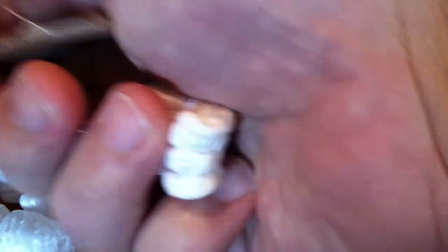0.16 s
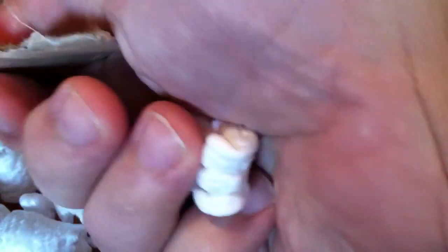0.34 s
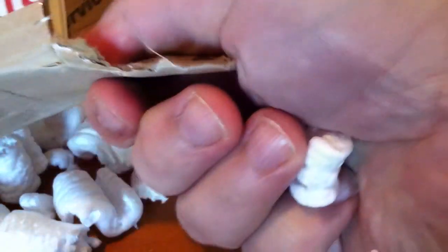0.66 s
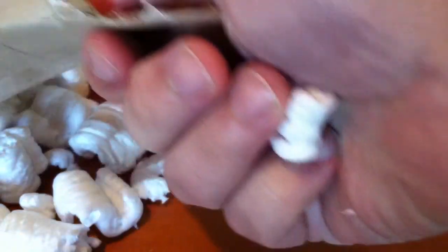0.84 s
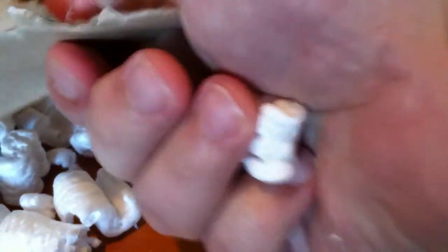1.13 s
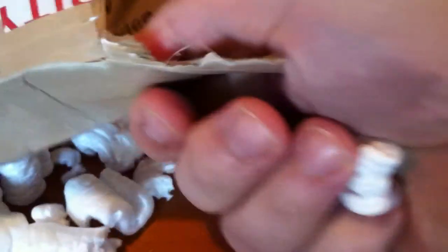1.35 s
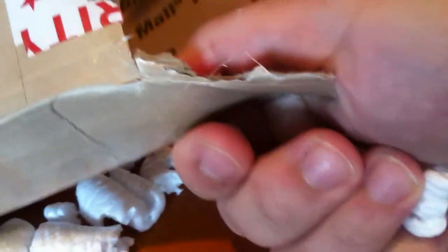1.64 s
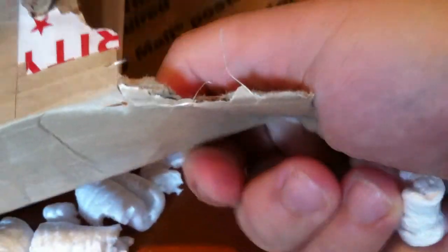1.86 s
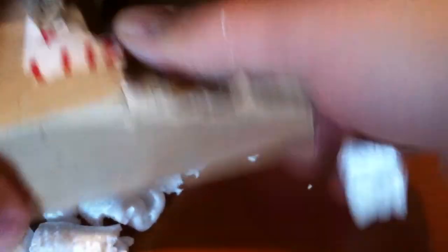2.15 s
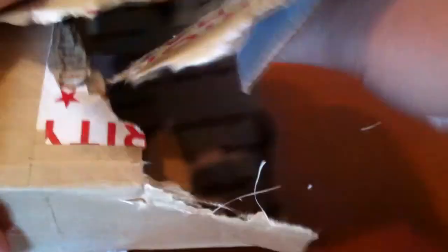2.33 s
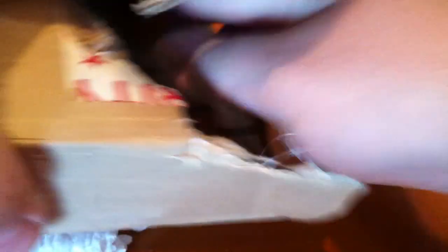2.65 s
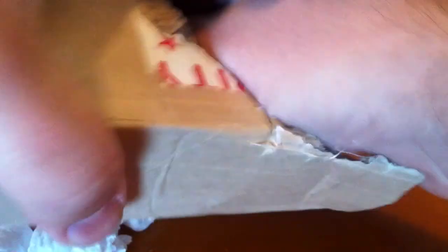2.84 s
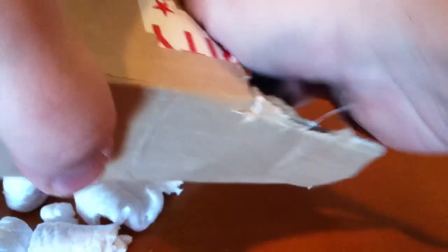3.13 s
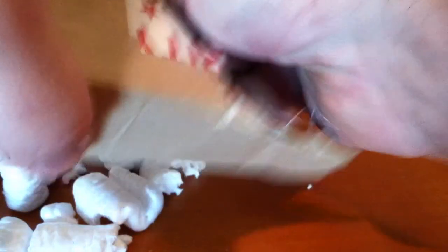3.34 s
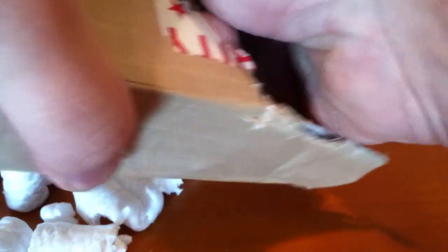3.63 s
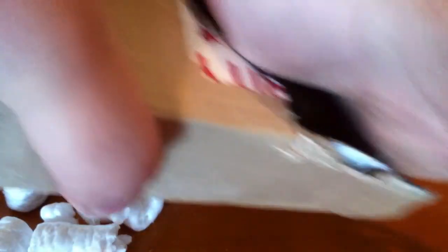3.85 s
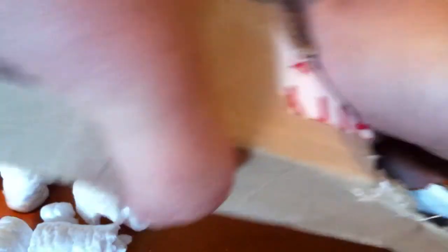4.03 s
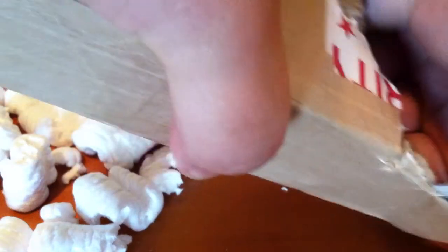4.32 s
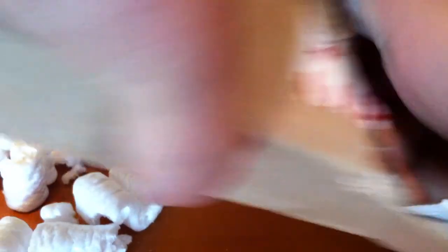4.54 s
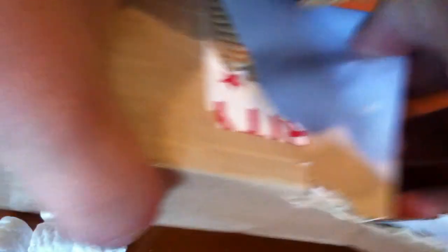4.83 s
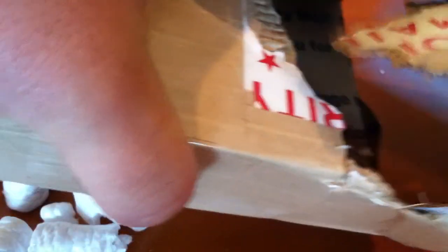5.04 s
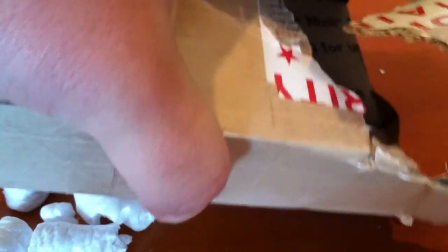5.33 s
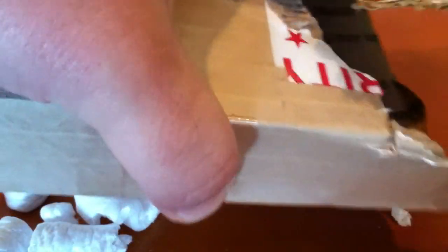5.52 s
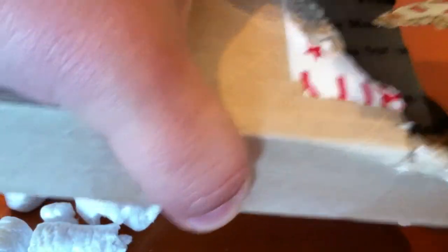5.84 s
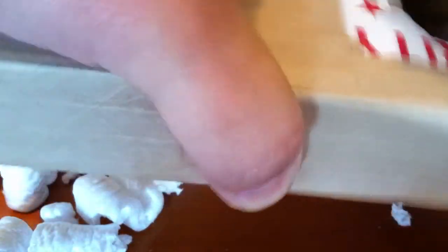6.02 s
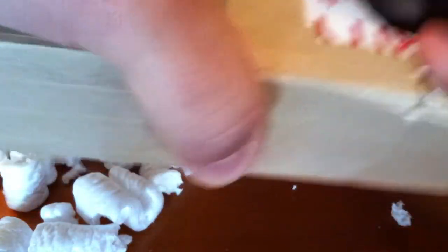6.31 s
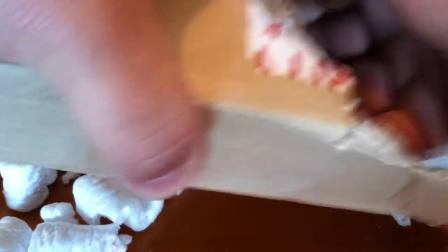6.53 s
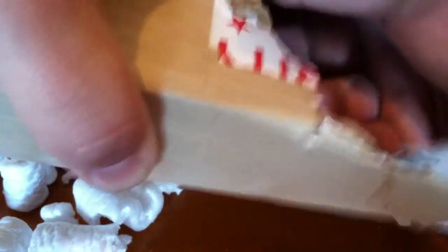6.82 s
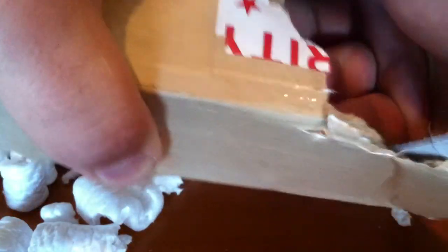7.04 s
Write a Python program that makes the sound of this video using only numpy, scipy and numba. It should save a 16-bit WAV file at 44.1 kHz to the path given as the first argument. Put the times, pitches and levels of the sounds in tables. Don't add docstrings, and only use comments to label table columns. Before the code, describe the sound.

Close, dry rustling and crackling of packing foam and cardboard, sharp snaps, scrapes and boxy thumps in a small quiet room.

```python
import sys
import numpy as np
from scipy import signal
from scipy.fft import rfft, irfft
from scipy.io import wavfile
from scipy.ndimage import uniform_filter1d
from numba import njit

SR = 44100
rng = np.random.default_rng(int(sys.argv[2]) if len(sys.argv) > 2 else 0)


def elevation(decibels):
    levels = np.asarray(decibels, float)
    return 10 ** (levels / 20)


def materialize(psi):
    bounded = np.clip(np.atleast_2d(psi).T, -1, 1)
    quanta = np.round(bounded * 32767).astype(np.int16)
    wavfile.write(sys.argv[1], SR, quanta)


N = 316197


def rubbing():
    # pitch_hz, width_hz, level_db
    hollow_modes = [(194, 63, 4), (293, 80, 5.5), (405, 87, 10)]
    wall_modes = [(589, 99, 2.5), (740, 53, 0), (936, 183, 5), (1300, 260, 5)]
    foam_modes = [(1860, 346, -0.5), (2365, 420, 0), (2680, 530, 1.5), (3370, 750, -0.5), (3870, 380, -1.5),
                  (4740, 970, 0.5)]
    edge_modes = [(5480, 440, -8), (6100, 1250, -8), (7500, 870, -7), (8130, 1160, -7), (11800, 7500, -26),
                  (13350, 1200, -21)]
    t = np.arange(N) / SR
    control_t = t[::64]
    levels = stroke_levels(control_t)
    hard = np.clip((np.interp(t, control_t, levels[2]) + 51.0) / 15, .15, 1)
    crackle = slips(420, spread_db=3.0, smear_s=.0009)
    rustle = slips(700, spread_db=2.0, smear_s=0.015) * elevation(2.3 * walk(40))
    shared = rustle + 1.13 * hard * crackle
    # modes, share of the common stream, patchiness_db, lift_db
    parts = [(hollow_modes, .5, 2.5, -1.5), (wall_modes, .7, 2.0, -1.5),
             (foam_modes, .85, 1.8, -1.2), (edge_modes, .85, 2.1, -1.35)]
    out = 0
    for db, (modes, share, patchy_db, lift_db) in zip(levels, parts):
        own = slips(500, spread_db=3.5, smear_s=0.0027)
        drive = share * shared + np.sqrt(1 - share ** 2) * own
        out = out + body(drive, modes, patchy_db) * elevation(np.interp(t, control_t, db) + lift_db)
    return out


def stroke_levels(t):
    # start_s, level_db, box_over_foam_db, fade_s (per 20 dB)
    grabs = [(0.0, -50, 3.5, 0.13), (0.088, -56, 1, 0.8), (0.39, -56.5, 2, 0), (0.496, -37.5, -5.5, 0.46),
             (1.202, -47, 4, 0.15), (1.332, -45.5, -5.5, 0.83), (2.252, -47, -2.5, 0.13),
             (3.614, -47.5, 0, 0.22), (3.801, -50, 2.5, 0.77), (3.998, -47.5, 1.5, 0.17),
             (4.035, -45.5, -4.5, 0.05), (4.069, -44.5, 2, -0.31), (4.216, -48.5, -0.5, 0.5),
             (4.411, -44.5, 5.5, -0.35), (4.559, -47.5, 4.5, 0.46), (4.62, -39, -17, 0.6),
             (4.847, -38.5, 0.5, 0.16), (5.085, -37.5, 0, 0.1239), (5.16, -43, -17, -0.02),
             (5.21, -60.5, -5, 1), (5.483, -46, -5.5, 0.12), (2.471, -54, -4.5, 0.03),
             (5.876, -43.5, -3, 0.3), (6.033, -50.5, -24, 0.52), (6.145, -55.5, 5, 0.5),
             (6.415, -49.5, 3.5, 0.85), (6.579, -49.5, 0.5, 0.2), (7.15, -51, 0.1, 0.5)]
    # peak_s, level_db, box_over_foam_db, swell_s, fade_s (per 20 dB)
    sweeps = [(0.298, -52, 2, -0.4, -0.75), (0.64, -41.5, -3, -0.01, 0.49), (0.813, -40.5, -6, 0.4, 0.08),
              (1.028, -44.5, -2.5, 0.1, 0.34), (1.445, -42.5, -0.5, 0.19, 0.07), (1.7, -51, -0.5, 0.1, 1),
              (1.999, -49, -4.5, 0.13, 0.5), (2.131, -43.5, -4.5, 0.12, 0.15), (2.407, -54.5, -12, 0, 0.1),
              (2.502, -53, 1.5, 0.4, 0.4), (2.766, -55.5, -21.5, 0.25, -0.26), (2.897, -51, 3.5, 0.5, 1.2),
              (3.072, -47.5, -0.5, 0, -0.31), (3.284, -44, 0, 0.1, 0.01), (3.489, -46.5, 1, 0.22, 0.05),
              (3.55, -55.5, 6, 0.2, 0.7), (4.345, -48.5, 1, -0.03, 0.3), (4.715, -38.5, 2, 0.22, 0.1753),
              (4.991, -45, -1, -1, 0.36), (5.018, -42, -5, -0.13, 0.0553),
              (5.766, -34.5, -6.5, -0.0176, 0.1044), (6.308, -47, 0, 0.3, 0.1),
              (6.476, -46.5, 4, 0.06, -0.11), (6.78, -51.5, -2.5, 0, 0.23), (6.93, -46, -1, -0.1, -0.05),
              (7.04, -48, 2.5, 0.07, 0.23), (6.715, -49, -9, 0.7, 0.5)]
    # time_s, boom_db (freedom of the hollow), paper_db (loose paper at the fingers)
    handling = [(0, -4, 0), (0.35, -4, -1), (0.8, 0.5, -6), (1.5, -1.5, 0), (2.0, 1, -3), (2.3, -23, -6),
                (2.7, -3, -1), (3.7, -6.5, -4), (4.2, -9.5, -5.5), (4.6, -7.5, -7), (5.3, 2, -4),
                (5.5, 1, 1.5), (5.7, 1, -10.5), (6.0, -13.5, -6.5), (6.4, -5.5, -1.5), (6.8, -2.5, -3),
                (7.17, -3, -4)]
    grab_swell_s = 0.03
    strokes = [(s, db, box_db, grab_swell_s, fade_s) for s, db, box_db, fade_s in grabs] + sweeps
    box_share = np.array([[0.99], [1], [0], [-0.19]])
    power = np.full((4, len(t)), 1e-9)
    for s, db, box_db, swell_s, fade_s in strokes:
        before = (s - t) / max(swell_s, .005)
        after = (t - s) / max(fade_s, .005)
        now_db = db - 20 * np.maximum(before, after)
        power += elevation(now_db + box_db * box_share) ** 2
    level_db = 10 * np.log10(power)
    brighter_db = 0.2051 * (level_db[2] + 47.0)
    s, boom_db, paper_db = np.transpose(handling)
    edge_db = np.interp(t, s, paper_db) + brighter_db
    return level_db + [np.interp(t, s, boom_db), 0 * t, 0 * t, edge_db]


def slips(per_s, spread_db, smear_s):
    hit = rng.random(N) < per_s / SR
    size = hit * elevation(np.minimum(spread_db * rng.exponential(1, N), 19))
    puff = signal.lfilter([1], [1, -np.exp(-1 / (smear_s * SR))], size)
    y = puff * rng.standard_normal(N)
    return y / np.std(y)


def walk(rate):
    k = int(SR / rate)
    steps = np.repeat(rng.standard_normal(N // k + 1), k)
    return 1.3 * uniform_filter1d(uniform_filter1d(steps, k), k)[:N]


def body(x, modes, patchy_db):
    y = 0
    for k, (hz, width_hz, db) in enumerate(modes):
        b, a = signal.iirpeak(hz, hz / (1.7 * width_hz), SR)
        rung = signal.lfilter(b, a, signal.lfilter(b, a, x)) / np.sqrt(width_hz)
        y = y + (-1) ** k * elevation(db + patchy_db * walk(18)) * rung
    return y / np.std(y)


def scrapes():
    # start_s, length_s, level_db, pitch_hz
    drags = [(0.08, 0.022, -49, 2290), (0.175, 0.045, -54, 6500), (0.376, 0.026, -47.5, 2190),
             (0.403, 0.092, -57, 4260), (0.48, 0.017, -45, 3500), (0.563, 0.013, -32, 4000),
             (0.867, 0.099, -46.5, 1220), (1.024, 0.017, -42, 5500), (1.332, 0.073, -45, 3130),
             (1.334, .045, -44, 7400), (1.981, 0.038, -44.5, 7500), (2.068, 0.044, -49, 4700),
             (2.119, .045, -46, 3280), (2.252, 0.027, -45.5, 3180), (2.382, 0.063, -55, 4740),
             (2.465, 0.028, -44, 3370), (2.493, 0.024, -41.5, 1060), (2.838, 0.05, -43, 1000),
             (2.895, 0.078, -46.5, 720), (2.879, 0.054, -46.5, 2820), (2.965, .11, -52.5, 4170),
             (3.011, 0.079, -48.5, 1400), (3.235, 0.11, -54, 3000), (3.428, 0.048, -52.5, 950),
             (3.446, 0.04, -48.5, 3220), (4.016, 0.064, -46.5, 3730), (4.21, 0.033, -53, 2960),
             (4.299, 0.028, -42, 405), (4.3, 0.044, -50, 800), (4.41, 0.073, -45.5, 885),
             (4.553, .012, -54, 3500), (4.845, 0.024, -32, 3140), (5.14, 0.052, -41.5, 4540),
             (5.762, 0.044, -39.5, 3600), (5.769, 0.1, -40, 5130), (5.788, 0.082, -42.5, 2300),
             (5.87, .1, -47, 5000), (6.013, 0.084, -47.5, 4960), (6.265, 0.066, -48.5, 4400),
             (6.475, 0.02, -37.5, 1670), (6.568, 0.072, -43.5, 4600), (6.583, 0.054, -49, 2460),
             (6.624, .016, -46, 2490), (6.75, 0.053, -47, 3220), (6.887, 0.071, -43, 940),
             (7.125, .045, -51.5, 653)]
    out, t = np.zeros(N), np.arange(N) / SR
    grains = slips(1500, spread_db=1.5, smear_s=0.0065)
    for s, length_s, db, hz in drags:
        i, j = int(s * SR), min(int((s + length_s) * SR), N)
        b, a = signal.iirpeak(hz, 2.7, SR)
        y = signal.lfilter(b, a, signal.lfilter(b, a, grains[i:j]))
        along = (t[i:j] - s) / length_s
        ends = np.clip(8 * np.minimum(along, 1 - along), 0, 1)
        out[i:j] += elevation(db - 6.5 * along) * y / np.std(y) * ends
    return out


def creases():
    # start_s, peak_db, brightest_hz, broad_share_db
    card = [(0.0943, -23.5, 1930, -13.5), (0.1366, -34, 2250, 16), (0.2293, -36, 1760, -17),
            (0.2947, -33, 2420, -9), (1.1159, -34.5, 1660, -4), (1.2141, -30, 2300, 4),
            (1.6473, -27, 4000, 6), (1.7584, -32.5, 1500, -27.5), (1.8781, -28.5, 1850, -32),
            (1.9914, -28.5, 2060, -8), (2.0566, -32, 2570, -24.5), (2.8855, -33, 1960, -37),
            (3.1746, -44, 1870, -27), (3.8349, -35.5, 1960, -49), (4.1106, -36.5, 1790, -40),
            (4.3983, -21, 1940, 3), (4.7439, -25, 1800, -8), (4.8184, -32, 2050, -21),
            (4.8534, -11.5, 1850, 13), (4.8753, -25.5, 1830, -2), (5.0802, -31.5, 1860, -22.5),
            (5.7651, -21, 2370, -16), (6.3766, -31, 1750, -13), (6.473, -28, 1720, -20),
            (6.486, -23, 1640, -44.5), (6.6264, -36, 2460, -14), (6.8783, -34, 2360, -6),
            (7.0354, -30.5, 1900, -27), (7.0584, -29, 1720, -33)]
    foam = [(0.5716, -11.5, 4060, 3), (0.5773, -11.5, 4130, 5.5), (0.5919, -8.5, 4100, 7),
            (0.6093, -1.5, 4300, 8), (0.7285, -26, 4070, -28), (1.3132, -32.5, 3250, 20),
            (1.3491, -42, 2870, -4), (1.4037, -22, 2980, -1), (1.4521, -11.5, 5400, 16),
            (1.9212, -24.5, 3030, -33), (2.0148, -27, 3030, -25), (2.0835, -32, 3680, -11),
            (2.508, -29.5, 3200, 6), (2.5412, -37, 3680, -27.5), (2.565, -44, 3170, -21),
            (2.6477, -36.5, 3830, -12), (3.447, -25, 3480, -6), (3.6123, -22, 2730, -4),
            (3.6568, -25.5, 3180, -32), (3.811, -41, 3300, -28), (3.9954, -26.5, 4300, -33.5),
            (4.3004, -18, 2900, -44), (4.555, -31, 3540, -5), (4.6177, -17, 3380, -21),
            (4.711, -36, 3160, -20), (4.843, -17, 2930, -25), (5.033, -7.5, 3150, -0.5),
            (5.8708, -25.5, 3220, -15), (6.3084, -28.5, 3340, -17), (6.415, -37, 3020, -21)]
    paper = [(0.4912, -16, 4250, 5), (0.5235, -13, 5200, 4), (0.6162, -12, 5460, -3),
             (0.622, -26, 5750, -18), (0.7018, -17, 5540, -1), (1.3897, -25, 7050, -4),
             (1.4336, -27, 6150, 0), (1.506, -15.5, 7060, -18), (1.56, -26.5, 7600, 6),
             (1.6137, -28, 7500, -14), (1.7813, -29, 6460, 2), (2.716, -38, 5100, -11),
             (4.212, -26, 4740, 18), (4.2735, -27.5, 4530, -3), (4.581, -21.5, 4370, -26),
             (5.48, -29, 5250, -10), (5.766, -22, 5300, -17.5), (6.0304, -37.5, 4950, -17)]
    ticks = [(0.044, -43, 5000, 4), (0.104, -40, 8000, 2), (0.167, -36.5, 7000, -1), (0.322, -43, 2500, 6),
             (0.387, -32.5, 2300, 1), (0.6295, -28, 6000, 0), (0.663, -32, 2950, -15),
             (0.7065, -23, 5970, -2), (0.893, -47, 8000, -3), (1.132, -36, 9000, -5),
             (1.3305, -31, 3150, -5.5), (1.4385, -26, 5960, -7), (1.4828, -35, 8240, -8.5),
             (1.5447, -34.5, 6000, 4), (1.585, -36, 5800, -2), (1.6045, -28, 5330, -4),
             (1.66, -33, 5000, 1), (1.7, -31.5, 4000, 2), (1.897, -35, 8000, -8), (2.135, -40, 6500, -8),
             (2.192, -33.5, 2000, -2), (2.367, -33, 5030, 1), (2.392, -46, 4640, -1),
             (2.473, -41, 3390, -7), (2.488, -34, 6000, -3), (2.523, -40, 6500, -3), (3.515, -36, 5000, 0),
             (3.582, -36, 2000, -22), (3.631, -33, 2000, -12), (3.678, -36.5, 2500, -6.5),
             (4.563, -37, 4000, -3), (4.635, -33, 4500, 1), (4.759, -37, 4000, -3), (4.881, -21, 5000, -4),
             (5.122, -36, 5000, 1.5), (5.348, -39, 5870, -6), (6.718, -34, 2200, -11.5),
             (6.787, -30, 3800, -11.5), (7.042, -31, 3540, -20), (0.8575, -22, 1550, -30),
             (2.8412, -30, 1000, -26), (1.3845, -30, 7500, 0), (1.4635, -26.5, 7000, 2)]
    crumples = [
        (0.522, -20, 4800, 1),
        (0.699, -27, 5500, 12),
        (0.727, -27, 5500, 2.5),
        (1.4035, -24.5, 5500, 8),
        (1.435, -27, 6000, 8),
        (1.481, -35.5, 7500, 1),
        (5.8715, -28.5, 2500, 4),
        (4.709, -24, 4000, 5),
    ]
    return snaps([(card, 0.015), (foam, 0.015), (paper, 0.013), (ticks, 0.0088), (crumples, 0.048)])


def snaps(kinds):
    out, t = np.zeros(N + 4096), np.arange(4096) / SR
    sheet = signal.butter(1, [1200, 8500], "band", fs=SR, output="sos")
    soft = signal.butter(3, 9500, fs=SR, output="sos")
    flip = 1.06 * np.array([1, 1, 0, -1, -1, 0])
    for rows, t60_s in kinds:
        for s, db, hz, broad_db in rows:
            swell_s = 0.00022 * elevation(-20.0 - db)
            burst = rng.standard_normal(len(t)) * elevation(-60 * t / t60_s) * np.clip(t / swell_s, .1, 1)
            burst[:6] += np.clip(elevation(db + 20), 1, 1.9) * flip
            b, a = signal.iirpeak(hz, 3.2, SR)
            wide = signal.sosfilt(sheet, burst)
            y = signal.sosfilt(soft, signal.lfilter(b, a, burst) + elevation(broad_db - 7.0) * wide)
            i = int(s * SR)
            out[i:i + len(t)] += elevation(db + 0.07) * y / np.max(np.abs(y))
    return out[:N]


def box_blows():
    # start_s, peak_db, panel_hz, ring_s
    thumps = [(0.492, -21, 376, 0.023), (0.568, -31.5, 395, 0.079), (0.717, -23, 267, 0.0092),
              (1.193, -33.5, 417, 0.018), (1.39, -22, 275, 0.015), (1.401, -23.5, 350, 0.015),
              (1.599, -32, 393, 0.019), (1.631, -34, 186, 0.015), (1.697, -35, 293, 0.034),
              (1.726, -32.5, 390, 0.025), (1.754, -32, 380, 0.018), (1.992, -31, 190, 0.04),
              (2.203, -30.5, 313, 0.02), (0.598, -29, 190, 0.054), (3.991, -22.5, 344, 0.021),
              (4.262, -37.5, 320, 0.037), (5.76, -29.5, 350, 0.079), (6.574, -26, 300, 0.012)]
    # start_s, peak_db, wall_hz, hollow_share_db
    wall_knocks = [(0.795, -26.5, 860, -6), (0.855, -23, 1086, -16), (1.451, -25.5, 1290, -34),
                   (2.537, -34, 630, -28), (2.838, -32.5, 975, -32.5), (2.884, -18.5, 654, -41),
                   (3.043, -35.5, 1270, -5), (3.115, -35, 1000, -23), (3.612, -21.5, 830, -12.5),
                   (3.869, -27, 896, -5.5), (4.213, -34, 1340, -8), (4.299, -16, 815, -3.5),
                   (4.572, -28.5, 1020, -28), (4.617, -24.5, 1160, -43), (4.706, -22.5, 1300, -16),
                   (4.846, -26, 1090, -9), (4.874, -25.5, 1230, -15), (5.029, -35, 1330, -26),
                   (5.076, -21, 1015, -33), (5.869, -32, 948, -17), (6.172, -29.5, 826, -4.5),
                   (6.22, -33, 900, -25), (6.256, -34, 900, -8), (6.304, -24.5, 965, -7.5),
                   (6.374, -32.5, 1170, -9), (6.867, -31.5, 960, -0.5), (7.032, -26, 1140, -13.5)]
    # start_s, peak_db, wall_hz, hollow_share_db
    taps = [(2.473, -34, 1300, -1), (2.563, -35, 587, -17), (2.646, -38.5, 700, -20),
            (2.714, -38.5, 710, -28), (2.945, -32, 726, -34), (3.179, -34, 1350, -17.5),
            (3.58, -33.5, 417, -11), (3.993, -23, 1010, -19), (4.233, -34, 1130, -15),
            (4.266, -35, 608, -7), (4.306, -21.5, 890, -12), (4.56, -27.5, 1250, -12),
            (4.68, -26.5, 1250, -17), (4.741, -25.5, 1050, -14), (6.738, -38, 1180, -26),
            (6.883, -32, 428, -26), (6.911, -30, 960, -20), (6.982, -35, 610, -18),
            (7.058, -27.5, 1030, -4.5), (7.076, -35, 424, -15)]
    blows = [(s, db, hz, -15, ring_s) for s, db, hz, ring_s in thumps]
    blows += [row + (0.02,) for row in wall_knocks]
    blows += [row + (0.013,) for row in taps]
    return knocks(blows)


def knocks(blows):
    s, db, hz, hollow_db, t60_s = np.transpose(blows)
    pitch, weaker, longer = rng.random((3, len(s), 12))
    main_hz = hz[:, None]
    close_hz = main_hz * (.8 + .45 * pitch[:, :2])
    panel_hz = 450 * 5.0 ** pitch[:, 2:9]
    hollow_hz = 200 * 2.1 ** pitch[:, 9:]
    side_hz = np.c_[close_hz, panel_hz, hollow_hz]
    near_db = -8 - 2.16 * np.abs(np.log2(side_hz[:, :9] / main_hz))
    side_db = np.c_[near_db, hollow_db[:, None] - 5 + 0 * hollow_hz]
    all_db = db[:, None] + 4.0 + np.c_[-3 + 0 * s, side_db - 4 * weaker]
    side_t60 = (.6 + .7 * longer) * (main_hz / side_hz) ** .4
    all_t60 = t60_s[:, None] * np.c_[1 + 0 * s, side_t60]
    return strikes(s + 0.002038, np.c_[hz, side_hz], all_db, all_t60, late_s=0.002903, rise_s=0.00071)


def booms():
    # start_s, peak_db, pitch_hz, ring_s
    pushes = [
        (0.495, -35.5, 393, 0.17),
        (0.991, -21, 225, 0.051),
        (1.027, -34.5, 220, 0.095),
        (3.039, -40, 177, 0.018),
        (4.751, -34, 109, 0.1),
        (6.166, -36, 193, 0.044),
    ]
    s, db, hz, t60_s = np.transpose(pushes)[:, :, None]
    close = np.array([0.88, 1, 1.15])
    close_db = db + np.array([-7, 0, -6])
    return strikes(s[:, 0], hz * close, close_db, t60_s + 0 * close, late_s=0.0116, rise_s=0.0039)


def strikes(s, hz, db, t60, late_s, rise_s):
    late = late_s * rng.random(hz.shape) ** 2
    start = ((s[:, None] + late) * SR).astype(np.int64)
    sign = np.sign(rng.standard_normal(hz.shape))
    size = sign * elevation(db)
    return ring(N, start.ravel(), hz.ravel(), t60.ravel(), size.ravel(), np.full(hz.size, rise_s))


@njit
def ring(n, start, hz, t60, size, rise):
    y = np.zeros(n)
    for k in range(len(start)):
        turn = np.exp(2j * np.pi * hz[k] / SR - np.log(1000) / (t60[k] * SR))
        z, gate, i = size[k] + 0j, 0., start[k]
        for j in range(min(int(t60[k] * SR), n - i)):
            gate += (1 - gate) / (1 + rise[k] * SR)
            y[i + j] += gate * z.imag
            z *= turn
    return y


def room(x, t60_s, wet_db):
    t = np.arange(int(.5 * SR)) / SR
    noise = rng.standard_normal((2, len(t)))
    dull = signal.lfilter([.15], [1, -.85], noise[0])
    tail = 1.07 * dull * elevation(-60 * t / t60_s) + noise[1] * elevation(-60 * t / (0.26 * t60_s))
    tail *= np.clip(t / 0.0012, 0, 1)
    return elevation(wet_db) * signal.fftconvolve(x, tail / np.sqrt(np.sum(tail ** 2)))[:N]


def quiet_house():
    # pitch_hz, level_db
    floor_colour = [(18, -64), (30, -11), (58, -11), (75, -8), (174, -0.5), (204, 3), (311, 4.5),
                    (1010, -10), (2170, -10.5), (6210, -47), (11100, -22), (14800, -33), (16000, -40)]
    return elevation(-65) * shaped(rng.standard_normal(N), floor_colour)


def shaped(x, points):
    hz, db = np.transpose(points)
    f = np.maximum(np.arange(N // 2 + 1) * SR / N, 1)
    y = irfft(rfft(x) * elevation(np.interp(np.log(f), np.log(hz), db)), N)
    return y / np.std(y)


def scene():
    rub = rubbing() + scrapes()
    hits = creases() + box_blows() + booms()
    box = hits + rub + room(hits + 0.8 * rub, t60_s=0.42, wet_db=-13.5)
    box = signal.sosfilt(signal.butter(4, 135, "high", fs=SR, output="sos"), box)
    return (box + quiet_house())[None]


def top_cut(x):
    return signal.sosfilt(signal.butter(12, 16650, fs=SR, output="sos"), x)


def record(dry):
    # start_s, end_s
    silence_s = (5.7535, 5.7605)
    t = np.arange(N) / SR
    lopsided = dry + 0.27 * dry ** 2
    x = signal.sosfilt(signal.butter(1, 18, "high", fs=SR, output="sos"), lopsided)
    x = signal.sosfilt(signal.butter(2, 13000, fs=SR, output="sos"), x)
    x = signal.sosfilt(signal.butter(10, 15600, fs=SR, output="sos"), x)
    outside_s = np.maximum(silence_s[0] - t, t - silence_s[1])
    fade = np.clip(outside_s / .004, 0, 1)
    return top_cut(x * fade)


dry = scene()
out = record(dry)
materialize(out)
```